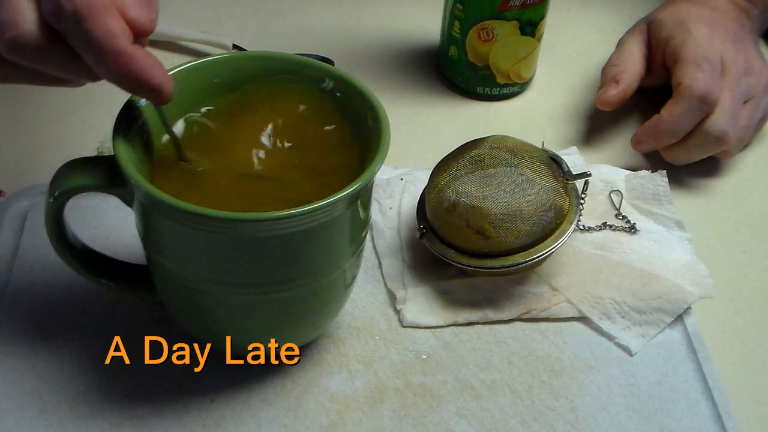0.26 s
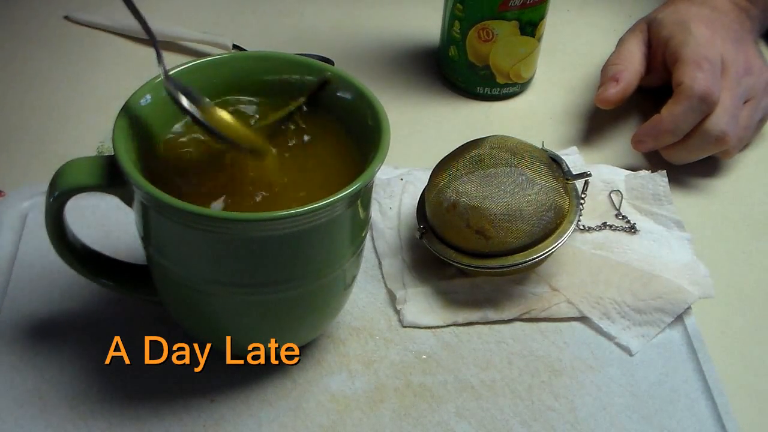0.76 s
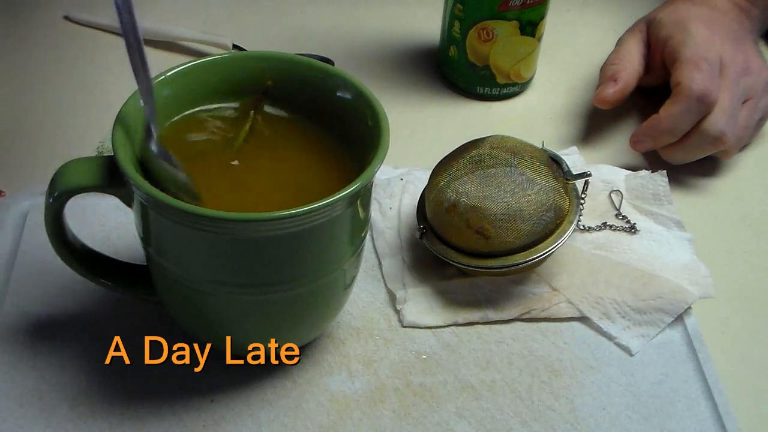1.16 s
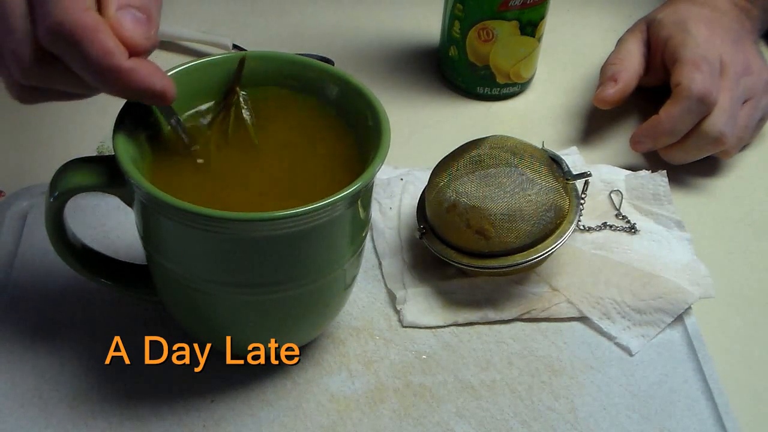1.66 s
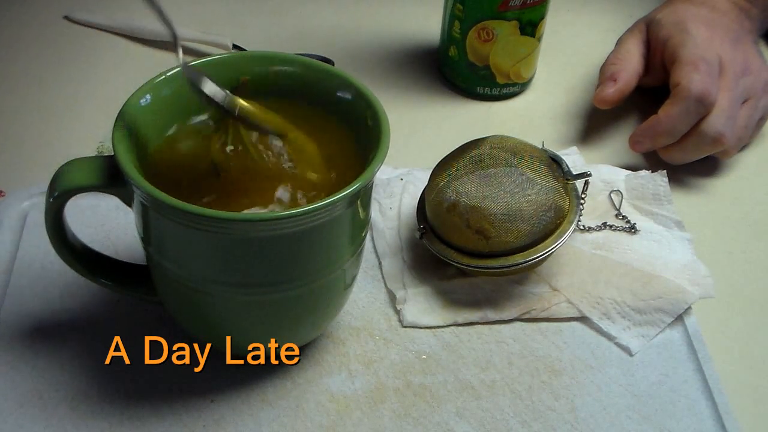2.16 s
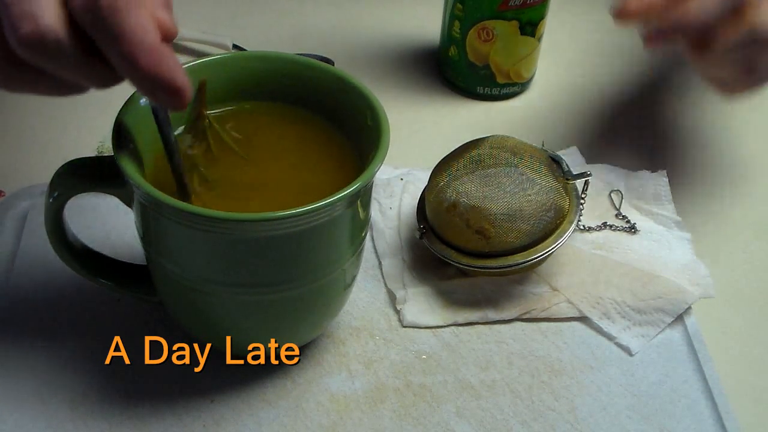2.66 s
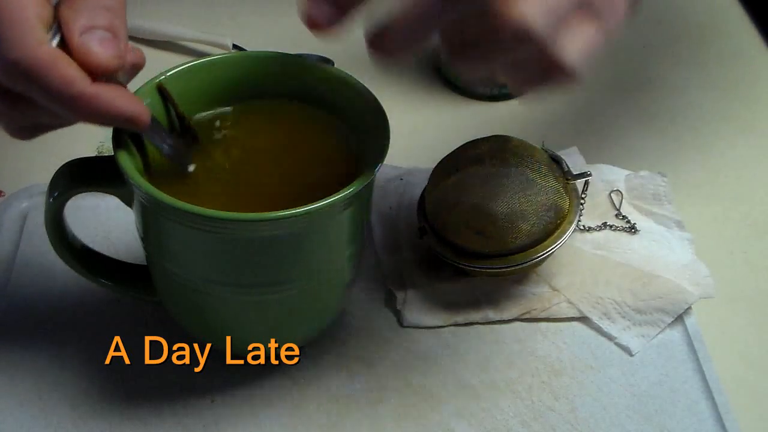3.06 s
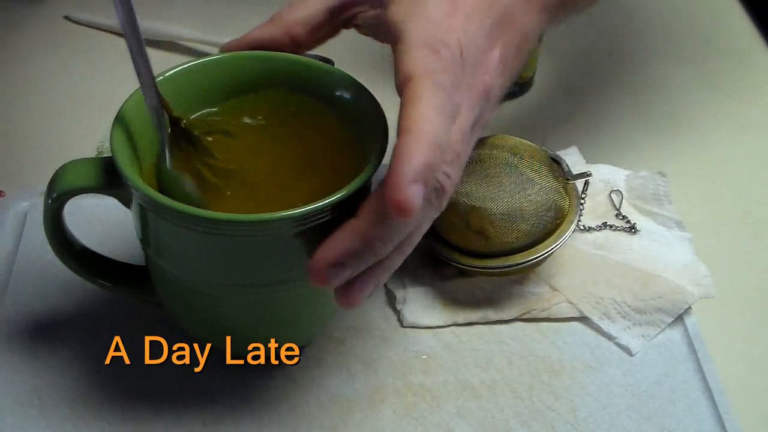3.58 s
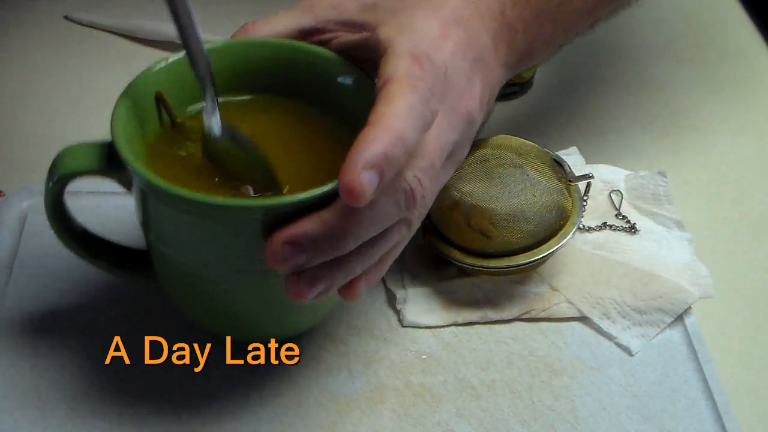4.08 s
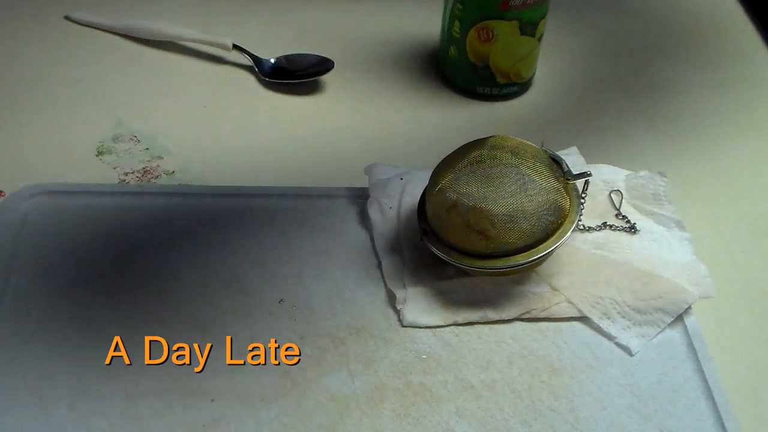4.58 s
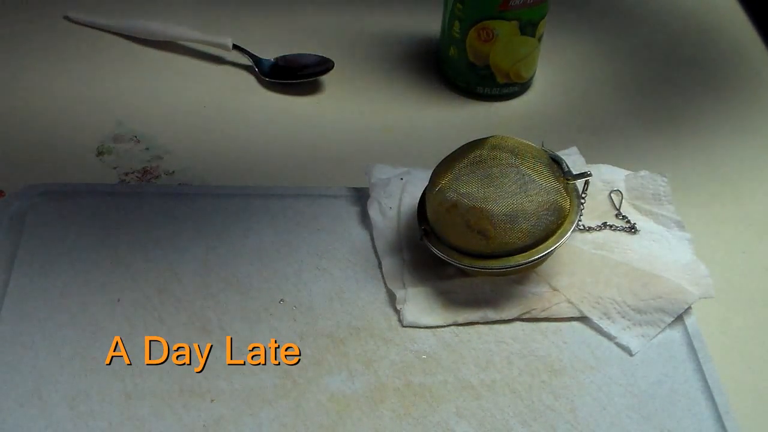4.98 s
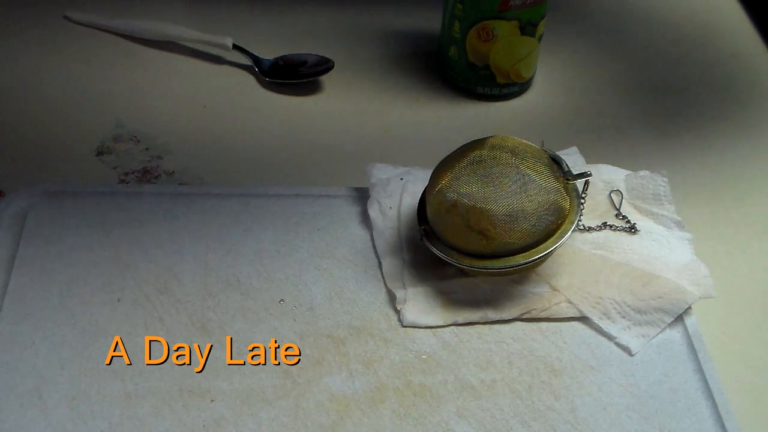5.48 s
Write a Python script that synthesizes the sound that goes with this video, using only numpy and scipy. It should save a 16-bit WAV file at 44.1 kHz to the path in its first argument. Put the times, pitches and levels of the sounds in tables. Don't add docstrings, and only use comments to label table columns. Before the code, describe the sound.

A teaspoon scrapes and clinks in a thick ceramic mug of tea, sparse bright rings over faint hiss and hum, ending in a small rattle.

```python
import sys
import numpy as np
from scipy import signal
from scipy.fft import rfft, irfft, next_fast_len
from scipy.io import wavfile
from scipy.ndimage import uniform_filter1d, map_coordinates

SR = 44100
rng = np.random.default_rng(int(sys.argv[2]) if len(sys.argv) > 2 else 0)


def to_linear_factor(level_db):
    exponent = np.asarray(level_db, float) / 20
    return 10 ** exponent


def to_wav(sig):
    pcm = np.clip(np.atleast_2d(sig), -1, 1) * 32767
    pcm = np.round(pcm).astype(np.int16)
    wavfile.write(sys.argv[1], SR, pcm.T)


N = 252693

# frequency in Hz, left-right level in dB, left lead in radians.
MUG = [(480, -0.1, 0.1), (588, -0.1, -0.0), (1698, 0.0, -0.0), (1797, 0, 0), (2056, -0.8, -0.1),
       (3014, 0.9, 0.2), (3582, 0.0, -0.0), (3902, -4.7, 0.1), (4362, 0.1, 0.1), (4462, -0.1, 0.1),
       (4606, -3.6, 0.5), (4655, -6, -0.8), (5510, -7.9, -0.3), (5597, -4.8, 0.3), (6000, -9.0, -0.4),
       (6696, 3.0, 2), (7674, 1, 1.5), (7894, -3.5, -0.4), (8188, -1.6, 1.0), (8490, 4, 0.7),
       (8834, 4, 1.2), (9402, 5.0, 0.6), (9753, -2.8, 1.5), (10528, -2.3, 0.4), (11210, -2.1, 0.2),
       (11820, 9.0, 2.5), (12258, -0.3, 0.8), (13350, 9.0, 0.6)]
# t60 in seconds, level struck low in dB, more at the rim in
# dB, waves round the wall (a count), offset in radians, more with a firm grip in dB.
SHAPES = [(0.16, -41.8, 9.1, 4.0, 3.01, -15.2), (0.032, -40.4, 6.5, 4.0, 3.08, 0.6),
          (0.29, -22.9, -3.3, 3.0, 1.06, -16.5), (0.37, -27.8, -2.7, 5.0, 2.63, -10.5),
          (0.11, -39.4, 9.5, 5.0, 2.5, -20.5), (0.27, -43.2, -5.2, 3.0, 1.08, -14.3),
          (0.17, -76.2, 13.4, 6.0, 1.32, 21.5), (0.041, -30.2, 8.6, 3.0, 2.71, -21.5),
          (0.25, -24.0, -8.1, 4.0, 1.89, -17.7), (0.074, -74.6, 15.9, 6.0, 1.6, 23.7),
          (0.16, -42.1, -8.6, 5.0, 0.52, 4.1), (0.26, -57.1, 2.3, 5.0, 0.16, 9.8),
          (0.38, -72.0, 23.8, 6.0, 1.77, 1.6), (0.12, -30.2, -12.7, 2.0, 1.15, 1.2),
          (0.033, -67.4, 11.7, 2.0, 1.33, 10.2), (0.07, -43.4, -7.6, 2.0, 1.39, -4.5),
         (0.22, -42.3, -15.4, 2.0, 1.23, 2.4), (0.08, -30.4, -16.7, 5.0, 1.89, -12.2),
         (0.3, -62.5, 12.3, 6.0, 1.43, 0.2), (0.083, -47.4, 19.3, 2.0, 2.33, 1.5),
         (0.22, -78.7, -16.8, 2.0, 1.17, 48.9), (0.12, -66.9, -11.1, 2.0, 1.31, 23.8),
         (0.075, -66.2, 15.8, 6.0, 1.79, 3.1), (0.06, -48.1, -15.5, 2.0, 1.2, 10.2),
         (0.071, -41.9, 0.6, 3.0, 1.8, -14.3), (0.077, -39.1, -9.4, 4.0, 0.34, -2.2),
         (0.071, -65.1, 14.3, 6.0, 1.98, 16.0), (0.092, -44.8, -0.3, 5.0, 1.84, -11.8)]
NODE_LEAK = .03
# start in seconds, ring in dB, ring length factor, crack in dB,
# share of the slow afterring (minus = opposed phase).
STRIKES = [
    [(1.338, 8.8, 1.7, 4.1, -0.28)],
    [(2.8314, -5.1, 2.16, -0.2, 0.54)],
    [(0.0, -17.5, 3.3, -27.2, 0.45), (3.9533, 8, 1.37, -16.7, 0.29), (3.9635, 0, 1.2, 1.8, 0.34)],
    [(3.9874, 13.9, 1.37, 9.2, -0.089)],
    [(4.9302, 10.8, 1.2, 6.1, 0.32)],
    [(5.3562, -7.6, 0.5, -16, 0.21)],
    [(1.563, -9.3, 1.26, -3, 0.44)],
    [(0.2584, -20.9, 1.5, -12, 0.51)],
]
SPOTS = [(4.51, 0.018, 2.6, 0.84), (6.073, 0.076, 6.01, 0.77), (1.129, 0.438, 2.16, 0.98),
         (0.88, 0.0, 0.09, 0.66), (0.377, 1.0, 1.36, 1.0), (2.034, 0.887, 0.17, 0.0),
         (1.597, 0.879, 2.11, 0.62), (5.575, 0.524, 3.52, 0.47)]
# new frequency of the nearest mode in Hz, more
# level in dB, length factor, more afterring share.
BENDS = [
    [(1701, 0, 1.1, -.08), (2056, -6, .9, 0), (3014, -10, 1.1, .1), (3902, -9, .9, 0), (4360, -8, 1.1, .45),
     (4613, -9, 1.3, .55), (5582, -6, .9, 0), (6696, 4, 1.1, .3), (12070, -6, 1.1, 0)],
    [(1701, 3, 1.05, 0), (1798, 3, 1.05, 0), (3014, 8, 1.1, -.2), (3582, -6, .8, 0), (4371, -3, 1.05, -.05),
     (5582, 4, 1.1, 0), (11970, 6, .9, 0)],
    [(2056, -12, .9, 0), (4362, -8, .9, 0), (5582, 3, 1.15, .1), (8490, -16, .9, 0), (8834, -16, .9, 0)],
    [(1698, -6, 1.1, 0), (1795, -8, 1.1, 0), (4362, -7, 1.1, 0), (4640, 4, .8, 0), (5587, 2, 1.1, 0),
     (8530, -4, 1.1, 0)],
    [(1698, 5, 1.1, 0), (1795, 5, 1.1, 0), (4362, 7, 1.1, 0), (8858, 9, 1.1, 0)],
    [(2056, -9, .9, 0), (4365, 3, 1.2, .05), (4602, -6, 1.4, .35), (4683, -2.5, 1.4, .35),
     (5587, -1.5, 1.45, .04), (6696, 3, 1.1, .25), (7671, -5.5, 1.05, .25)],
    [(1798, 9.5, 1.12, -.6), (3574, -4, 1.5, .25), (4362, -8, 1.1, 0), (4468, -9, 2.6, .4),
     (4606, -8, 1.1, 0), (5480, -2, 1.3, .25), (5556, -1.5, 2.4, .15), (6696, 13, 1.1, .05),
     (7674, 1.5, 1.2, .1), (9738, 6, 1.3, .1)],
    [(3919, -11, 4.5, .4), (4349, -8, 1.9, .3), (5550, 6, 1.5, .2)],
]
# new frequency of the nearest mode in Hz, more level
# in dB, # length factor, more afterring share.
LIGHT_BENDS = [
    [(3800, -3, 1.3, 0), (4365, 5, 1.1, 0), (5580, -9, 1.5, .3), (8527, -4, 1.2, .1)],
    [(1701, 3.5, .9, -.1), (1798, 2.5, .9, -.1), (5593, 1.5, 1.2, .1), (8543, 3.5, 1.1, 0)],
]
# frequency in Hz, width in Hz, level in dB,
# more with a firm grip in dB, waves round the bowl (a count), offset in radians.
CRACK = [(542.0, 160.0, -38.0, -29.0, 4.0, 1.7), (1260.0, 550.0, -35.4, -19.3, 3.0, 2.21),
         (2080.0, 840.0, -20.0, -21.0, 1.0, 2.89), (2800.0, 840.0, -38.9, 7.5, 4.0, 0.1),
         (3640.0, 500.0, -32.8, 3.9, 1.0, 2.11), (4950.0, 710.0, -36.6, 5.0, 2.0, 3.02),
         (5800.0, 570.0, -61.2, 34.4, 4.0, 0.72), (7000.0, 920.0, -24.8, -19.8, 3.0, 2.99),
         (8740.0, 330.0, -44.1, 15.6, 2.0, 0.26), (9800.0, 420.0, -59.8, 26.8, 3.0, 1.16),
         (11060.0, 650.0, -43.4, 12.7, 4.0, 2.59), (12130.0, 300.0, -47.5, 20.7, 3.0, 1.35),
         (12700.0, 380.0, -40.1, -2.1, 2.0, 0.85)]
# frequency in Hz, more level in dB.
FAVOURS = [
    [(2080, 5), (3640, -7), (4950, -3), (5800, -3.5), (8740, -4), (12130, -3), (12700, -6)],
    [(1260, 3), (2080, -4), (2800, 3), (3640, -3), (4950, 3)],
    [(542, 6)],
    [(542, -12), (4950, 17), (5800, 4), (8740, -5), (11060, 9), (12130, 5)],
    [(542, -4), (1260, -3), (2080, 5), (2800, -10), (9800, 4), (11060, -7), (12700, -4)],
    [(1260, 4), (2080, -6), (2800, -6), (7000, -5), (12700, 5)],
    [(1260, -10), (2080, 7), (4950, -4), (8740, -5), (11060, 3)],
    [(542, -14), (1260, 4), (2800, 4), (3640, -20), (7000, -5), (12130, -14), (12700, -5)],
    [(3640, -3), (4950, -9), (5800, -10), (8740, -5), (9800, -13), (12700, -6)],
    [(2080, 4), (7000, -1.5), (8740, -4), (11060, -4), (12700, -7)],
]
# delay in seconds, level in dB.
NEAR = [(.0035, -9.5), (.0068, -19), (0.0107, -25.5)]
# hardest moment in seconds, rasp in dB, swell and fade in seconds for 20 dB.
SCRAPES = [(.005, -64, .02, .06), (.045, -66, .03, .05), (.085, -64, .04, .04), (.106, -60, .04, .06),
           (.2, -73, .15, .04), (.33, -66, .04, .05), (.372, -59.5, .07, .07), (.49, -75, .08, .1),
           (.584, -59, .07, .09), (.63, -66, .03, .05), (1.45, -79, .04, .05), (1.73, -62, .12, .1),
           (1.85, -78, .1, .1), (1.93, -66, .04, .15), (1.978, -67, .1, .04), (2.782, -72, .08, .03),
           (2.98, -69, .1, .2), (3.09, -67, .08, .08), (3.14, -70, .03, .05), (5.01, -68, .02, .05)]
# frequency in Hz, width in Hz, level in dB.
RASP = [(562, 137, 1), (1293, 260, 1), (2020, 330, 2.5), (4900, 3400, -6.5), (11500, 4000, -10)]
# peak in seconds, lower mode in dB, upper mode in dB, t60 in seconds.
NUDGES = [(.082, -59, -61, .2), (.2, -73, -67, .4), (.3, -56, -55, .4), (.372, -70, -62, .4),
          (.44, -68, -69, .2), (.51, -70, -63, .3), (.584, -66, -61, .6), (1.45, -47.5, -56, .2),
          (1.53, -61, -59, .2), (1.63, -61, -61, .35), (1.69, -72, -59, .3), (1.73, -62, -69, .25),
          (1.82, -72, -72, .5), (2.0, -64, -66, 1.1), (2.782, -83, -76, .3), (2.97, -66, -80, .3),
          (3.16, -76, -67, .7), (5.0, -52, -62, .2), (5.058, -64, -52, .4), (5.12, -62, -55, .4),
          (5.22, -80, -70, .6)]
NUDGE_SWELL_S = .06
# peak in seconds, level in dB, frequency in Hz,
# swell and fade in seconds for 20 dB.
SQUEAKS = [(.048, -59, 3600, .015, .05), (.08, -56, 3600, .03, .03), (.103, -56, 3980, .03, .025),
           (.122, -59, 3650, .02, .012), (.108, -61, 7300, .01, .03), (.155, -60, 3900, .015, .05),
           (.19, -61, 3900, .04, .03), (.345, -62, 3900, .03, .04), (.375, -57, 4050, .04, .06),
           (.46, -63, 3950, .04, .06), (.5, -67, 3800, .04, .04), (.59, -72, 3900, .05, .05),
           (1.45, -75, 3900, .04, .05), (1.73, -72, 4000, .08, .08), (3.085, -65, 4000, .02, .03),
           (3.965, -38, 4100, .003, .012)]
SQUEAK_WIDTH_HZ = 260
# start in seconds, peak in dB, centre in Hz, width in octaves,
# t60 in seconds.
TICKS = [
    (0.0418, -42, 1390, 2.1, 0.034),
    (1.2575, -42.5, 2310, 1.26, 0.018),
    (2.4615, -51, 3200, 0.97, .012),
    (2.7815, -45, 1760, 0.97, 0.01),
    (3.4592, -53, 1700, 0.79, 0.025),
    (4.235, -56, 7000, 1, .01),
    (4.494, -39.5, 2220, 0.99, 0.014),
    (5.480, -53, 1150, 0.61, 0.017),
]
# start in seconds, peak in dB, frequency in Hz, t60 in seconds.
DROPS = [(0.0, -48, 600, .06), (.042, -46, 540, .04), (.075, -49, 620, .06), (.262, -50, 480, .05),
         (3.9537, -36, 4950, .015), (5.3565, -29, 1750, .016), (5.369, -44, 1800, .012),
         (2.835, -50, 1935, .15), (.043, -44, 3700, 0.035), (.064, -43, 1650, 0.029),
         (.105, -56, 7000, 0.013), (.110, -37, 1455, 0.025), (.1635, -44, 1505, 0.057),
         (.208, -45.5, 3700, 0.023), (.32, -54.5, 640, .08), (.36, -54, 2080, .06), (.583, -52, 2030, 0.06),
         (1.71, -55, 2080, .08), (1.257, -44, 5830, .015), (1.97, -45, 1343, 0.035),
         (1.973, -59, 4950, .03), (2.283, -54.5, 1390, .04), (2.4617, -33, 3240, 0.013),
         (3.8775, -46, 4200, .012), (3.8775, -46, 5300, .012), (3.879, -41, 1470, 0.023),
         (3.884, -54, 1700, 0.12), (4.03, -47, 687, 0.077), (4.498, -45.5, 1150, 0.033)]
# peak in seconds, level in dB, fade in seconds for 20 dB.
RATTLE = [
    (5.363, -42, .05),
    (5.41, -51, .12),
    (5.444, -48, .06),
    (5.5, -55, .07),
    (5.6, -63, .07),
    (5.73, -63, .05),
]
# frequency in Hz, width in Hz, level in dB.
RATTLED = [(1700, 42, 3.5), (1790, 60, 3), (1920, 85, -3), (4400, 150, -20.5)]
SHIVER_SWELL_S = .007
# first tick in seconds, gap in seconds, level in dB,
# frequency in Hz, t60 in seconds.
CHAIN = (3.462, .0672, -59, 2860, .03)
# peak in seconds, level in dB, swell and fade in seconds for 20 dB.
BUMPS = [
    (1.594, -60, .08, .15),
    (2.71, -66, .13, .12),
    (2.784, -60, .06, .07),
    (2.858, -58.5, .08, .12),
    (3.08, -68, .1, .03),
    (3.87, -57.5, .1, .2),
    (3.986, -53, .05, .17),
]
# frequency in Hz, level in dB rms.
HUM = [(30, -57.5), (59.5, -69), (119, -79)]
# frequency in Hz, level in dB per Hz.
AIR = [(8.8, -32.5), (15, -6.5), (71, -12.5), (87, -16), (556, -27.5), (5150, -35), (13800, -37),
       (15000, -63)]
# frequency in Hz, likeness from 0 to 1.
ALIKE = [(30, 0.55), (90, 0.27), (170, 0.075), (15000, 0.017)]
# frequency in Hz, t60 in seconds.
KITCHEN = [(300, 0.24), (2000, .45), (6000, 0.46), (13000, 0.29)]
# frequency in Hz, likeness from 0 to 1.
WIDE = [(300, 0.17), (1200, 1), (2000, 0.84), (2800, 0.73), (4000, 0.23), (13000, 0.1)]
RING_IN_ROOM_DB = -3
# start in seconds, gain in dB, hold in seconds.
DUCKS = [
    (1.33, -2.5, .45),
    (3.95, -2.2, .45),
    (4.925, -6.5, .36),
]
DUCK_S, RECOVER_S, SETTLE_DB, SETTLE_S = .06, .1, 1.5, .7
TOP_HZ = 14530


def clinks():
    track, t = np.zeros((2, N + 2 * SR)), np.arange(SR // 2) / SR
    blows = [(spot, *strike) for spot, strikes in enumerate(STRIKES) for strike in strikes]
    for blow, bends, favours in zip(blows, BENDS + LIGHT_BENDS, FAVOURS):
        spot, s, ring_db, length, crack_db, after = blow
        ring = to_linear_factor(ring_db) * mug_ring(t, spot, length, after, bends)
        knock = to_linear_factor(crack_db) * crack(t, spot, favours)
        add(track, s, kitchen(ring + knock, -9.5, to_linear_factor(RING_IN_ROOM_DB) * ring + knock))
    return filtered(track[:, :N], lambda f: (1j * f / (380 + 1j * f)) ** 2)


def mug_ring(t, spot, length, after, bends):
    angle, height, _, grip = SPOTS[spot]
    hz, pan_db, lead = np.transpose(MUG)[:, :, None]
    t60, *shape, grip_db = np.transpose(SHAPES)[:, :, None]
    db = struck(shape, angle, height) + grip_db * grip
    after = after + 0 * hz
    for bent_hz, more_db, longer, more_after in bends:
        k = np.argmin(abs(np.transpose(MUG)[0] - bent_hz))
        hz[k] = bent_hz
        db[k] += more_db
        t60[k] *= longer
        after[k] += more_after
    walk = np.cumsum(rng.standard_normal((len(hz), len(t))), 1)
    slosh = uniform_filter1d(walk, size=40) * (hz / SR) ** 1.1 * 0.28
    fast = to_linear_factor(-60 * t / (.55 * t60 * length))
    slow = after * to_linear_factor(-60 * t / (1.64 * t60 * length) - 220 * t ** 2)
    side = np.array([.5, -.5])[:, None, None]
    wave = np.sin(2 * np.pi * hz * t + slosh + side * lead)
    modes = to_linear_factor(db + side * pan_db) * (fast + slow) * wave
    return modes.sum(1) * (1 - np.exp(-t / 0.00081))


def crack(t, spot, favours):
    hz, width_hz, *shape = np.transpose(CRACK)[:, :, None]
    db = struck(shape, *SPOTS[spot][2:])
    for near_hz, more_db in favours:
        db[np.argmin(abs(hz - near_hz))] += more_db
    lead = rng.standard_normal((2, len(hz), 1)) * hz / 12000
    decay = np.exp(-1.6 * width_hz * t)
    knock = (to_linear_factor(db + 3) * decay * np.sin(2 * np.pi * hz * t + lead)).sum(1)
    body = resonances(np.hstack([hz, width_hz, db]))
    grit = rng.standard_normal(len(t)) + 0.31 * rng.standard_normal((2, len(t)))
    chatter = filtered(grit * to_linear_factor(9.5 - 60 * t / 0.034), body)
    echoes = sum(to_linear_factor(echo_db) * np.roll(knock, round(s * SR), axis=1) for s, echo_db in NEAR)
    return chatter + knock + echoes


def struck(shape, angle, place):
    db, more_db, waves, offset = shape
    node = abs(np.cos(np.round(waves) * angle - offset)) + NODE_LEAK
    return db + more_db * place + 20 * np.log10(node)


def scrape():
    grit = rng.standard_normal(N) * to_linear_factor(2.1 * wobble(30.35) + 0.33 * wobble(200))
    rasp = unit(filtered(grit, lambda f: resonances(RASP)(f) ** 2))
    return to_linear_factor(6.5) * rasp * swells(*np.transpose(SCRAPES))


def nudged_hum():
    s, lower_db, upper_db, t60 = np.transpose(NUDGES)
    t = np.arange(N) / SR
    pair = 0
    for (hz, _, _), db in zip(MUG[2:4], (lower_db, upper_db)):
        level = to_linear_factor(5 + 0.76 * wobble(40))
        hum = level * np.sin(2 * np.pi * hz * t + 0.93 * wobble(25))
        pair = pair + hum * swells(s, db, [NUDGE_SWELL_S], t60 / 3)
    return pair


def squeaks():
    rough = filtered(rng.standard_normal((2, N)), lambda f: 1 / (1 + (2 * f / SQUEAK_WIDTH_HZ) ** 2))
    rough, t = unit(rough[0]) + 1j * unit(rough[1]), np.arange(N) / SR
    track = np.zeros(N)
    for s, db, hz, swell_s, fade_s in SQUEAKS:
        whistle = (rough * np.exp(2j * np.pi * hz * t)).real
        track += whistle * swells([s], [db], [swell_s], [fade_s])
    return track


def ticks():
    track, t = np.zeros(N + SR), np.arange(SR // 8) / SR
    for s, db, centre_hz, octaves, t60 in TICKS:
        band = lambda f: np.exp(-(np.log2((f + 1) / centre_hz) / octaves) ** 2)
        puff = unit(filtered(rng.standard_normal(len(t)), band))
        add(track, s, puff * to_linear_factor(db - 60 * t / t60))
    return track[:N]


def drops():
    track, t = np.zeros(N + SR), np.arange(SR // 8) / SR
    for s, db, hz, t60 in DROPS:
        bubble = np.sin(2 * np.pi * hz * t * (1 + .4 * t)) * (1 - np.exp(-t / 0.00081))
        add(track, s, to_linear_factor(db - 60 * t / t60) * bubble)
    return track[:N]


def rattle():
    s, peak_db, fade_s = np.transpose(RATTLE)
    shiver = rng.standard_normal(N) * to_linear_factor(2.3 * wobble(45))
    return unit(filtered(shiver, resonances(RATTLED))) * swells(s, peak_db, [SHIVER_SWELL_S], fade_s)


def chain():
    track, t = np.zeros(N), np.arange(SR // 20) / SR
    first, gap, db, hz, t60 = CHAIN
    for k, scatter_db in enumerate(rng.normal(0, 1.9, size=6)):
        add(track, first + k * gap, to_linear_factor(db + scatter_db - 60 * t / t60) * np.sin(2 * np.pi * hz * t))
    return track


def bumps():
    panel = resonances([(142, 20, 2.5), (189, 36, -2), (337, 450, -10.5)])
    boom = unit(filtered(rng.standard_normal(N), panel))
    return boom * swells(*np.transpose(BUMPS))


def fridge():
    t = np.arange(N) / SR

    def line(hz, db):
        level = to_linear_factor(db + 2 + 0.82 * wobble(5.05))
        return level * np.sin(2 * np.pi * hz * t + 1.44 * wobble(5.5))

    return sum(line(hz, db) + 0.38 * np.array([line(hz, db), line(hz, db)]) for hz, db in HUM)


def air():
    return to_linear_factor(-57 + 1.2 * wobble(3.62)) * hiss(AIR)


def hiss(spectrum):
    return unit(spread(rng.standard_normal((2, N)), ALIKE, lambda hz: to_linear_factor(along(spectrum, hz))))


def kitchen(x, wet_db, feed):
    hz, t, z = signal.stft(rng.standard_normal((2, SR // 2)), SR, nperseg=256)
    decay = to_linear_factor(-60 * t / along(KITCHEN, hz)[:, None])
    tail = signal.istft(z * decay, SR, nperseg=256)[1]
    tail = spread(tail, WIDE, np.ones_like)
    delayed = np.pad(feed, ((0, 0), (120, 0)))
    wet = signal.fftconvolve(delayed, tail / np.linalg.norm(tail[0]), axes=1)
    return np.pad(x, ((0, 0), (0, wet.shape[1] - x.shape[1]))) + to_linear_factor(wet_db) * wet


def spread(pair, alike, gain):
    turn = lambda hz: np.arccos(np.clip(along(alike, hz), -1, 1)) / 2
    mid, side = filtered(pair, lambda hz: gain(hz) * np.array([np.cos(turn(hz)), np.sin(turn(hz))]))
    return np.array([mid + side, mid - side])


def swells(s, db, swell_s, fade_s):
    t = np.arange(0, N + 64, 64) / SR
    late = t - np.c_[s]
    down = np.maximum(-late / np.c_[swell_s], late / np.c_[fade_s])
    gain = to_linear_factor(np.c_[db] - 20 * down).sum(0)
    return np.interp(np.arange(N) / SR, t, gain)


def resonances(modes):
    def response(f):
        return sum((-1) ** k * to_linear_factor(db) * 1j * f * w / (c * c - f * f + 1j * f * w)
                   for k, (c, w, db) in enumerate(modes))
    return response


def filtered(x, response):
    m = next_fast_len(x.shape[-1] + 8192)
    return irfft(rfft(x, m) * response(np.fft.rfftfreq(m, 1 / SR)), m)[..., :x.shape[-1]]


def wobble(rate):
    return map_coordinates(rng.standard_normal(int(N * rate / SR) + 4), [np.arange(N) * rate / SR])


def along(points, hz):
    f, v = np.transpose(points)
    return np.interp(np.log(hz + 1), np.log(f + 1), v)


def unit(x):
    return x / np.sqrt(np.mean(x ** 2) + 1e-20)


def add(track, s, sound):
    start = round(s * SR)
    track[..., start:start + sound.shape[-1]] += sound


def scene():
    contact = scrape() + nudged_hum() + squeaks() + ticks()
    small = np.tile(contact + drops() + rattle() + chain() + bumps(), (2, 1))
    return clinks() + kitchen(small, -10, small)[:, :N] + fridge() + air()


def top_cut(x):
    return signal.sosfilt(signal.butter(12, 15270, fs=SR, output="sos"), x)


def record(dry):
    t = np.arange(N) / SR
    gain_db = SETTLE_DB * np.exp(-t / SETTLE_S)
    for s, db, hold in DUCKS:
        dip = np.minimum((t - s) / DUCK_S, 1 - (t - s - hold) / RECOVER_S)
        gain_db += db * np.clip(dip, 0, 1)
    late_hiss = to_linear_factor(-66.5) * hiss([(20, -13), (400, 4.5), (15000, -5)])
    heard = dry * to_linear_factor(gain_db) + late_hiss
    mix = filtered(heard, lambda hz: 1 / (1 + (hz / TOP_HZ) ** 70))
    return top_cut(mix)


dry = scene()
out = record(dry)
to_wav(out)
```